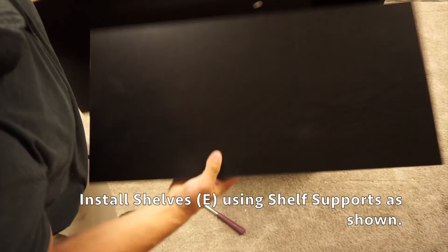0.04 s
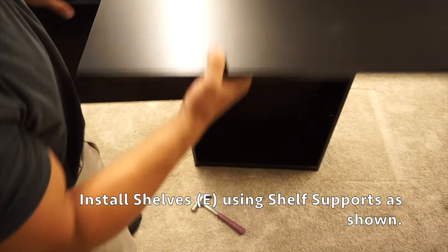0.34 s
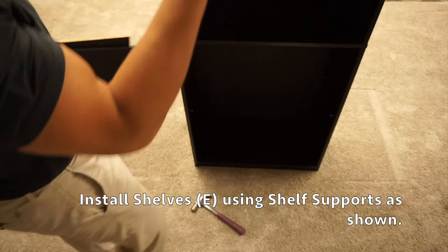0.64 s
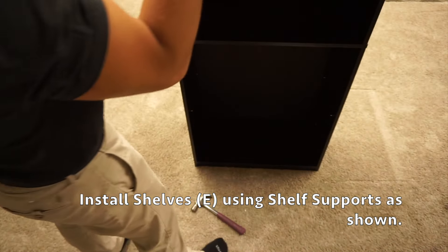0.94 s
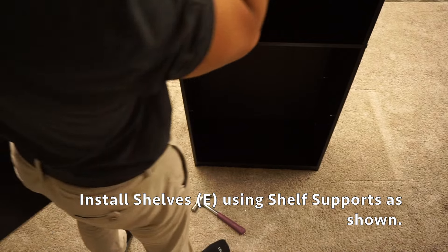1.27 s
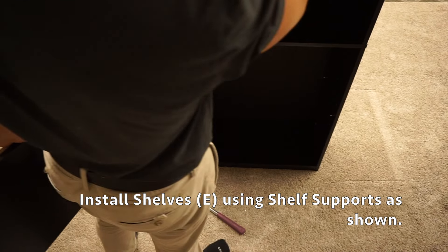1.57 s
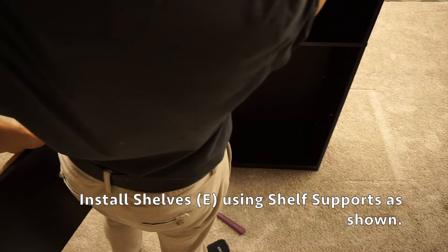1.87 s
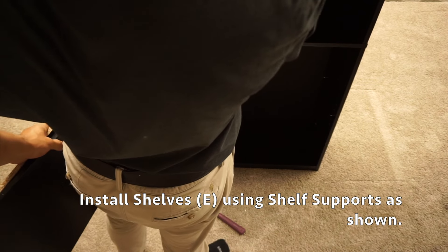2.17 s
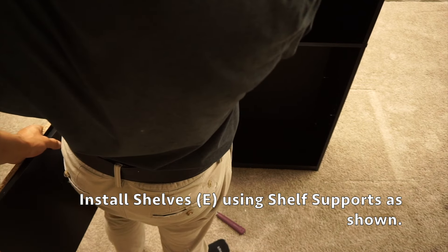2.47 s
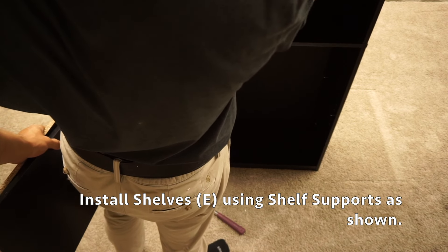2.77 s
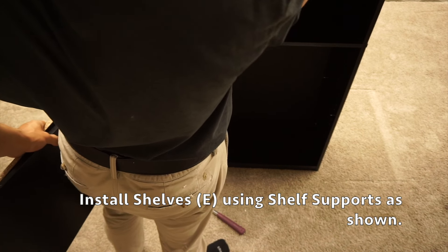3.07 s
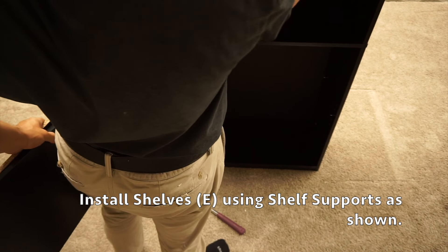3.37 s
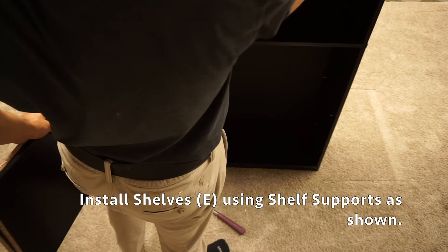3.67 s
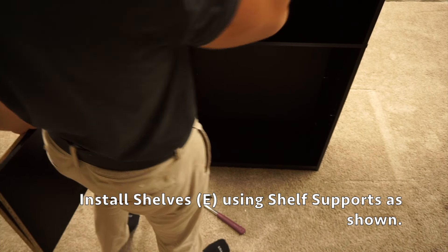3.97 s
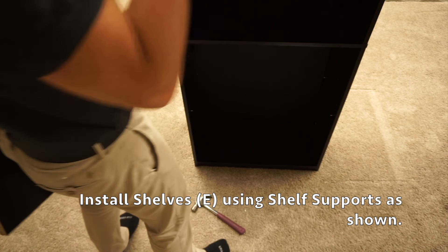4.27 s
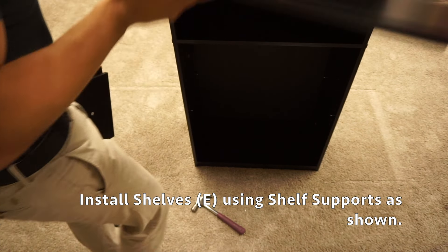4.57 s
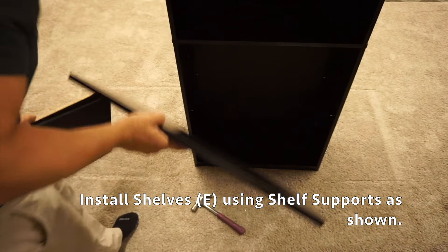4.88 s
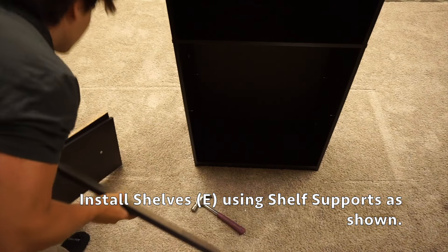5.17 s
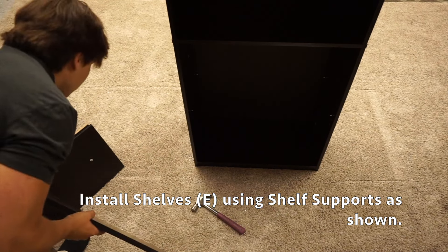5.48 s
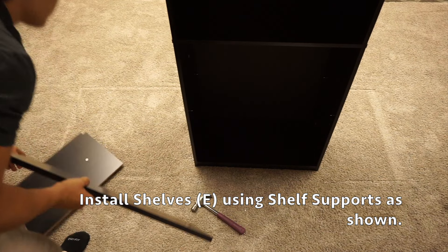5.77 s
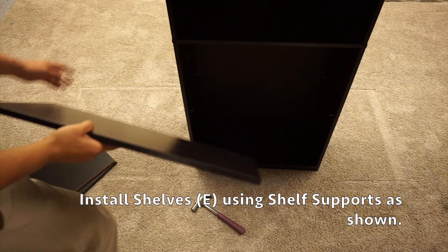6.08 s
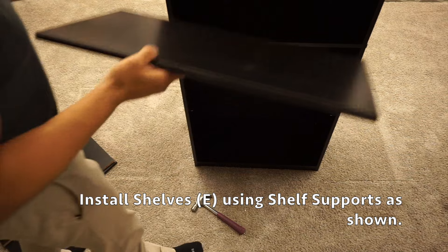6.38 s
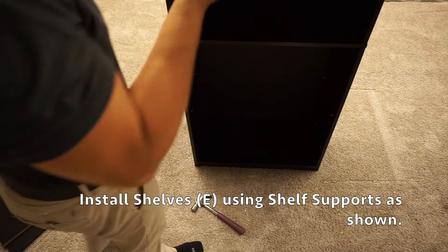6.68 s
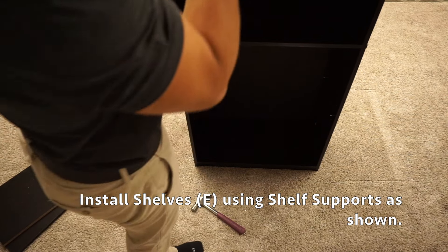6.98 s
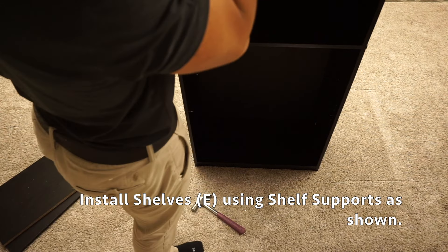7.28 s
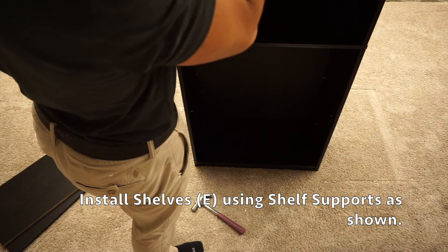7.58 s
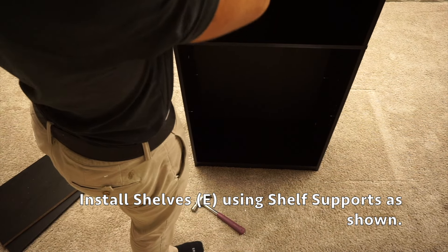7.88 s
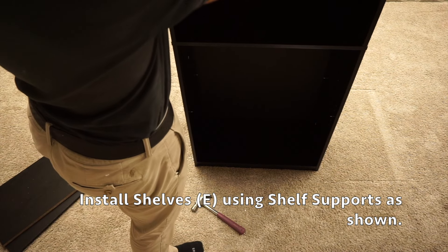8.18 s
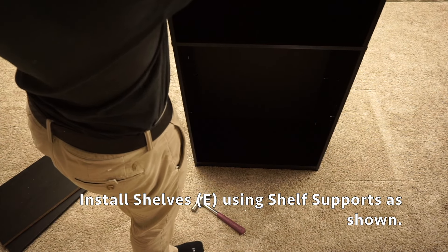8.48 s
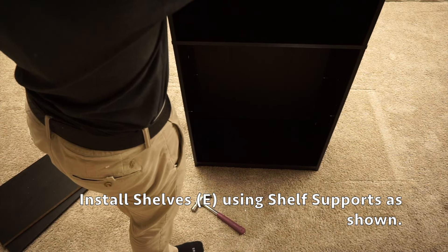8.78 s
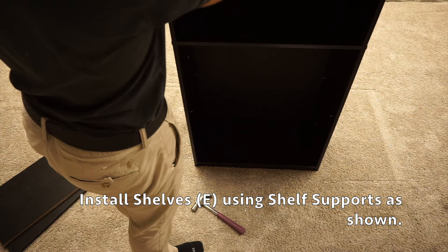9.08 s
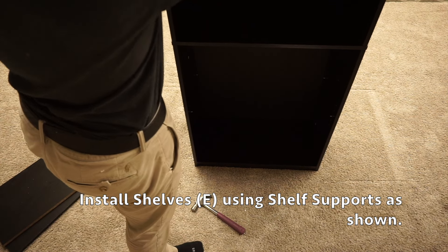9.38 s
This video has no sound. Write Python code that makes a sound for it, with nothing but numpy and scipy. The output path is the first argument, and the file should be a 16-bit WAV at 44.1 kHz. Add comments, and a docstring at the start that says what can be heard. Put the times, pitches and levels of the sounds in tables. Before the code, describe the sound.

Two wooden shelves bump, rasp and settle inside a hollow cabinet, one after the other, over a low room hum.

```python
"""Wooden shelf boards knock and scrape into a hollow bookcase, which rings with every contact.
Each of the two boards bumps the side panels, rasps inward in short pushes with the odd stick-slip
squeak, drops onto its pegs and rocks to rest. Between the two, a board is picked up and thumps the
carpet, and clothes rustle. Under it all lie a low ventilation rumble, mains hum and a faint hiss."""
import sys
import numpy as np
from scipy import signal
from scipy.fft import rfft, irfft, next_fast_len
from scipy.io import wavfile
from scipy.ndimage import uniform_filter1d

SR = 44100
rng = np.random.default_rng(int(sys.argv[2]) if len(sys.argv) > 2 else 0)


def generate_wav(signal):
    """Clip the signal to [-1, 1] and save it as 16-bit WAV at the path in sys.argv[1]."""
    frames = np.transpose(np.atleast_2d(signal))
    scaled = np.clip(frames, -1, 1) * 32767
    pcm = np.round(scaled).astype(np.int16)
    wavfile.write(sys.argv[1], SR, pcm)


N = 420846


def amp(db):
    return 10 ** (np.asarray(db) / 20)


def unit_rms(x):
    return x / np.sqrt(np.mean(x ** 2) + 1e-20)


def bins(size):
    return np.fft.rfftfreq(size, 1 / SR)


def add(mix, start_s, sound):
    part = mix[:, max(round(start_s * SR), 0):][:, :sound.shape[1]]
    part += sound[:, :part.shape[1]]


def curve_at(points, hz):
    """A curve of straight lines on a log-frequency axis."""
    point_hz, value = np.transpose(points)
    return np.interp(np.log(hz + 1), np.log(point_hz + 1), value)


def eq(x, points):
    """Shapes x with an EQ curve of (Hz, dB) points."""
    size = next_fast_len(x.shape[-1])
    return irfft(rfft(x, size) * amp(curve_at(points, bins(size))), size)[..., :x.shape[-1]]


def causal(db):
    """Minimum-phase response with the given gain: nothing sounds before the blow."""
    log_gain = np.log(amp(np.r_[db, db[-2:0:-1]]))
    return np.exp(np.conj(signal.hilbert(log_gain)))[:len(db)]


def wander(hz):
    """Random unevenness up to the given rate."""
    return unit_rms(signal.sosfilt(signal.butter(2, hz, fs=SR, output="sos"), rng.standard_normal(N)))


# Tone of the background air. Each row: frequency in Hz, relative level in dB.
AIR_EQ = [(12, -16), (20, -2.5), (64, 3), (92, -4), (124, -4.5), (157, -12), (204, -18), (288, -17.5),
          (328, -23.5), (355, -19), (475, -22.5), (528, -20.5), (1300, -27.5), (3020, -34.5), (11000, -39),
          (14300, -93), (22000, -120)]
# Its stereo spread. Each row: frequency in Hz, side against mid in dB.
AIR_WIDTH = [(20, -44), (60, -34), (110, -20), (190, -4.5), (350, -2), (1100, 1.5), (3600, 2), (11000, 0.5)]

def room_tone(air_db=-48.5, hum_hz=121.3, hum_db=-57.5):
    """A steady bed of ventilation rumble, mains hum and microphone hiss, as left and right."""
    mid, side = amp(air_db) * unit_rms(eq(rng.standard_normal((2, N)), AIR_EQ))
    mid = mid + amp(hum_db) * np.sqrt(2) * np.sin(2 * np.pi * hum_hz * np.arange(N) / SR)
    side = eq(side, AIR_WIDTH)
    return np.array([mid + side, mid - side])


# Decay of the carpeted room. Each row: frequency in Hz, seconds to fall by 60 dB.
ROOM_DECAY = [(60, 0.55), (150, 0.24), (350, 0.34), (1000, 0.37), (3000, 0.58), (9000, 0.42)]
# Tone of the reverb as it begins. Each row: frequency in Hz, relative level in dB.
ROOM_EQ = [(60, 2), (150, -7), (350, -7), (1000, -10.5), (3000, -19), (9000, -16)]

def room_tail(size):
    """Mid and side of the room's echoes; each frequency dies at its own speed."""
    hz, t, noise = signal.stft(rng.standard_normal((2, size)), SR, nperseg=256)
    fade_db = curve_at(ROOM_EQ, hz)[:, None] - 60 * t / curve_at(ROOM_DECAY, hz)[:, None]
    return signal.istft(noise * amp(fade_db), SR, nperseg=256)[1][:, :size]


def in_room(x, wet_db):
    """Adds the room's echoes to a mid and side pair."""
    tail = room_tail(size=32768)
    return x + amp(wet_db) * signal.oaconvolve(x[:1], tail / np.linalg.norm(tail[0]), axes=1)[:, :N]


def stroke(start_s, rise_s, length_s, db, swell_db=17, release_db_per_s=286):
    """Envelope of one rubbing movement: it swells, holds, and dies away once the hand stops."""
    t = np.arange(N) / SR - start_s
    attack_db = -swell_db * np.clip(1 - t / max(rise_s, .001), 0, 1)
    release_db = -release_db_per_s * np.clip(t - length_s, 0, 1)
    return (t >= 0) * amp(db + attack_db + release_db)


def friction(eq_points, uneven_db, catch_hz, panels=()):
    """Countless tiny slips merge into a rasp that swells as surfaces catch, ringing any panels given."""
    slips = amp(uneven_db * wander(catch_hz)) * rng.standard_normal((2, N))
    size = 2 * next_fast_len(N // 2 + 1)
    for panel in panels:
        slips = irfft(rfft(slips, size) * panel(bins(size)), size)[:, :N]
    return unit_rms(eq(slips, eq_points))


# Cloth's midrange rub and its airy hiss. Each row: frequency in Hz, relative level in dB.
RUB_EQ = [(200, -3), (600, 0), (1100, 6.5), (2500, 1), (5000, -15)]
HISS_EQ = [(1000, -25), (2500, 0.5), (4300, 2.5), (7000, -4.5), (11000, -7)]
# Clothes and board brushing the carpet. Each row: start, attack and length in seconds,
# relative levels of rub and hiss in dB.
BRUSHES = [(0.923, 0.063, 0.21, -60.5, -69), (4.7, 0.077, .54, -61.5, -70.5),
           (5.261, .018, 0.076, -76, -53.5), (5.398, 0.011, 0.14, -58.5, -55.5),
           (5.579, 0.04, 0.086, -49.5, -61), (5.745, 0.18, 0.067, -51, -46.5),
           (5.844, .002, .005, -46.5, -55), (5.872, 0.092, 0.25, -60.5, -54.5),
           (6.138, 0.07, 0.22, -60, -64)]

def rustle():
    """Cloth and carpet fibres brush in a fine, soft grain."""
    rub = amp(-3) * friction(RUB_EQ, uneven_db=0.5, catch_hz=60)
    hiss = amp(-1) * friction(HISS_EQ, uneven_db=1.9, catch_hz=150)
    out = np.zeros((2, N))
    for *timing, rub_db, hiss_db in BRUSHES:
        out += stroke(*timing, rub_db) * rub + stroke(*timing, hiss_db) * hiss
    return in_room(out, wet_db=-4.5)


# Board on the floor. Each row: mode frequency in Hz, relative level in dB, seconds to fall by 60 dB.
FLOOR_MODES = [(73, -16, 0.18), (120, -5, 0.046), (127, -5.5, 0.086), (149, -8.5, 0.068),
               (295.6, -13.5, 0.13), (354, -26, 0.099), (425, -33, 0.17)]
# Fibres crushed under the board's corner. Each row: frequency in Hz, relative level in dB.
PUFF_EQ = [(80, -18), (200, 6.5), (380, 5), (550, -14.5), (1000, -23), (2500, -51), (6000, -42)]

def carpet_thump(start_s=5.8435, rise_s=0.004, ring_db=-5.5, puff_db=-31, puff_s=0.073):
    """A board's corner lands on carpet, which softens the blow to the lowest modes and a dull puff."""
    out, t = np.zeros((2, N)), np.arange(SR) / SR
    ring = sum(amp(db - 60 * t / t60) * np.sin(2 * np.pi * hz * t) for hz, db, t60 in FLOOR_MODES)
    puff = amp(puff_db) * unit_rms(eq(rng.standard_normal((2, SR)), PUFF_EQ)) * np.exp(-t / puff_s)
    attack = 1 - np.exp(-t / rise_s)
    add(out, start_s, (amp(ring_db) * np.array([ring, 0 * ring]) + puff) * attack)
    return in_room(out, wet_db=-9.5)


# Squeaking edges. Each row: midpoint in seconds, length in seconds, pitch in Hz, level in dB.
SQUEAKS = [(.02, 0.058, 404, -51), (0.163, 0.1, 398, -47), (0.181, 0.08, 1024, -44),
           (0.208, 0.045, 511, -39), (.19, 0.059, 1808, -53.5), (2.576, 0.038, 296.4, -28),
           (4.002, 0.0388, 296, -25.5), (5.615, 0.058, 694, -51.5), (5.643, 0.097, 990, -51.5),
           (9.033, 0.015, 2790, -49.5), (9.377, .045, 648, -31.5)]

def squeaks(waver=0.021, overtone_db=-22):
    """An edge sticks and slips at a nearly steady rate, giving a short, wavering tone."""
    out = np.zeros((2, N))
    for middle_s, length_s, hz, db in SQUEAKS:
        wobble = unit_rms(uniform_filter1d(rng.standard_normal(SR), size=200))[:int(length_s * SR)]
        phase = 2 * np.pi * np.cumsum(hz * (1 + waver * wobble)) / SR
        envelope = amp(db) * np.sqrt(2) * np.hanning(len(phase))
        tone = envelope * (np.sin(phase) + amp(overtone_db) * np.sin(2 * phase))
        add(out, middle_s - length_s / 2, np.array([tone, 0 * tone]))
    return in_room(out, wet_db=-9.0)


def resonances(modes, hz):
    """Response of a panel: ringing peaks on a flat floor of dense modes."""
    peaks = sum(amp(db) ** 2 / (1 + (2 * (hz - centre) / width) ** 2) for centre, width, db in modes)
    return causal(10 * np.log10(1 + peaks))


# Modes of a shelf board. Each row: frequency in Hz, width in Hz, dB against the floor of dense modes.
BOARD_MODES = [(624, 22, 2), (798, 23, 2.5), (1634, 18, 8), (1910, 57, 6), (2260, 50, 10), (2780, 63, 5),
               (2920, 84, 9.5), (3870, 76, 8), (4460, 67, 0.5), (5900, 90, 1.5)]

def board(hz):
    """The bright ring of a board while its edge rasps."""
    return resonances(BOARD_MODES, hz)


# Modes of the bookcase. Each row: frequency in Hz, width in Hz, dB against the floor of dense modes.
CABINET_MODES = [(39.5, 2.7, 21), (59.2, 1.6, 23), (88, 3.2, 15.5), (127, 10, -3), (149.5, 8, 8),
                 (204.4, 3.5, 10.5), (237.6, 8.8, 10), (274, 26, 1.5), (273.7, 29, 7), (303, 28, 7.5),
                 (388, 6.2, -11), (424.2, 6.8, 10.5), (633, 18, 9), (778, 37, 0.5), (837, 9.2, 8.5),
                 (926, 15, 12.5), (1038, 44, 14), (1083, 34, 9.5), (1210, 23, 10), (1366, 40, 10),
                 (1878, 58, 3), (2150, 140, -3), (2130, 9.1, 8), (2450, 25, 6.5), (2708, 59, 10),
                 (3610, 20, 9), (3690, 78, 2.5), (4560, 24, -24), (4764, 27, 7), (4570, 38, 3.5),
                 (5680, 51, 6), (6890, 56, 8.5)]

def cabinet(hz):
    """The hollow ring of the bookcase's panels."""
    return resonances(CABINET_MODES, hz)


# The board's low drag and its edge's bright grit. Each row: frequency in Hz, relative level in dB.
DRAG_EQ = [(60, -26.5), (140, -7), (290, 6.5), (450, -2.5), (680, -2.5), (1000, -15.5), (1800, -14),
           (2900, -21), (4500, -60)]
GRIT_EQ = [(300, -34), (800, -14.5), (1900, 3.5), (2800, -3), (3300, 3), (4200, -1), (6000, -9),
           (11000, -10.5)]
# Pushes along the side panels. Each row: start, attack and length in seconds, relative levels of drag
# and grit in dB, the board mode that the grip leaves free in Hz.
PUSHES = [(0.0, 0.0013, 0.0084, -46, -57, 1270), (0.091, 0.047, 0.12, -56, -53, 1340),
          (2.112, 0.084, 0.18, -32, -52.5, 1980), (2.5, 0.058, 0.08, -30.5, -40.5, 4230),
          (2.737, 0.066, 0.08, -35.5, -46.5, 4060), (3.107, 0.029, 0.22, -55, -60.5, 1820),
          (3.737, 0.085, .16, -49, -52.5, 1740), (7.627, 0.048, 0.087, -56.5, -47.5, 4700),
          (7.986, .02, 0.093, -41.5, -48, 1920), (8.137, 0.01, 0.044, -30.5, -41, 2220),
          (8.205, 0.017, 0.083, -27, -42.5, 1620), (8.305, 0.04, 0.096, -26.5, -38.5, 2280),
          (8.438, 0.0078, 0.037, -44, -47, 6740)]

def scrapes(ring_db=-2, ring_q=13, judder_db=1.2, judder_hz=50):
    """The board's weight shakes the panels while its raw edge rasps along them and sets it ringing."""
    drag = amp(-3) * friction(DRAG_EQ, uneven_db=-2.5, catch_hz=120, panels=(cabinet, board))
    grit = amp(-2) * friction(GRIT_EQ, uneven_db=2.0, catch_hz=214, panels=(cabinet, board))
    out = np.zeros((2, N))
    for *timing, drag_db, grit_db, ring_hz in PUSHES:
        rasp = grit + amp(ring_db) * signal.lfilter(*signal.iirpeak(ring_hz, ring_q, fs=SR), grit)
        out += stroke(*timing, drag_db) * drag + stroke(*timing, grit_db) * rasp
    return in_room(out * amp(judder_db * wander(judder_hz)), wet_db=-10.0)


# Edges in Hz of a knock's five registers: boom, body, clack, crack and tick.
REGISTER_EDGES_HZ = [60, 180, 500, 1500, 4500, 11000]
# Offsets in dB that all knocks share, for body, clack, crack and tick.
REGISTER_DB = [0.12, 2.35, 0.52, 0.28]

def knock_colour(spectrum, hz, strength_db, tilt_db, boom_db, window_s=0.028):
    """EQ that balances a knock's registers: the softer the contact, the faster the treble falls off."""
    edges = np.array(REGISTER_EDGES_HZ)
    centres = np.sqrt(edges[1:] * edges[:-1])
    octaves_above_body = np.log2(centres[1:] / centres[1])
    target_db = strength_db + np.r_[boom_db, np.array(REGISTER_DB) + tilt_db * octaves_above_body]
    energy = np.histogram(hz, edges, weights=abs(spectrum) ** 2)[0] / (len(hz) - 1)
    gain_db = target_db - 10 * np.log10(energy / (window_s * SR))
    return causal(curve_at(np.c_[centres, gain_db], hz))


# Broad tone of the struck wood. Each row: frequency in Hz, relative level in dB.
WOOD_EQ = [(30, -13.5), (70, -10), (100, -1.5), (135, 10), (300, 1.5), (480, -4), (1000, -25.5),
           (2000, -13.5), (3200, -15.5), (4200, -22), (5300, -35), (7000, -40.5), (11000, -45.5)]
# Board against cabinet. Each row: start in seconds, the low and the high mode this spot favours in Hz,
# strength in dB, hardness as treble tilt in dB per octave, carcass boom in dB, chatter decay in seconds.
KNOCKS = [(0.712, 133, 820, -60.5, -2.5, -3, 0.0062), (1.127, 372, 1820, -53.5, -3.5, -9, 0.0039),
          (1.279, 310, 2100, -31.5, -4, -7, 0.013), (1.282, 294, 965, -20.5, -7, -30.5, 0.0096),
          (1.296, 292, 930, -20, -13, -18, 0.0055), (1.5535, 273, 1060, -32.5, -0.42, 3, .007),
          (1.559, 289, 1860, -17.5, -6.5, -20, .0043), (1.6, 292, 1370, -18, -17, -12, 0.0054),
          (1.645, 261, 1090, -29.5, -6.5, -10, 0.0014), (1.803, 325, 1050, -23, -6, 3.5, 0.018),
          (1.826, 148, 412, -22, -7.5, -5.5, 0.012), (1.872, 291, 3460, -40, -3.5, 12.5, 0.027),
          (1.929, 136, 1810, -33.5, -9, 3.5, 0.028), (2.26, 316, 6600, -17, -7.5, -9.5, 0.014),
          (2.322, 285, 435, -26, -12, -10, 0.01), (2.36, 330, 1130, -23.5, -10.5, -31, 0.0058),
          (2.374, 321, 970, -20.5, -19.5, -3, 0.008), (2.513, 303, 3750, -48, -8, -10, 0.0048),
          (2.812, 292, 3820, -33, -5.5, -2.5, 0.0053), (2.829, 280, 430, -30.5, -13, -5.5, 0.014),
          (3.958, 315, 4700, -57, 1, 2, 0.016), (3.975, 304, 2290, -27, -5.5, -30, 0.016),
          (3.993, 305, 700, -27, -6.5, -9.5, 0.008), (4.051, 268, 1071, -37.5, -2.5, -9, 0.022),
          (4.061, 303, 1050, -28, -5, -14, 0.014), (7.431, 269, 770, -16, -13, -15, 0.012),
          (7.448, 207, 861, -17.5, -20, -9, 0.014), (7.479, 208, 730, -25.5, -8.5, -0.5, 0.011),
          (7.509, 287, 800, -20.5, -13, -3, 0.012), (7.793, 306, 1090, -33.5, -4, -15, 0.018),
          (7.809, 161, 1060, -29, -5, -4, 0.01), (7.895, 323, 3900, -26, -5, -14, 0.011),
          (7.913, 310, 710, -26, -4.5, -7.5, 0.015), (7.956, 185, 5300, -47, -1, 0, 0.015),
          (8.218, 282, 800, -27.5, -5.5, -13, 0.034), (8.5178, 145, 1560, -17, -5, -9.5, 0.013),
          (8.535, 264, 3600, -26, -4.5, 5, 0.0052), (8.546, 153, 2720, -21, -3.5, -6, 0.0038),
          (8.595, 137, 1220, -24.5, -10, -2, 0.0027), (8.6657, 302, 5600, -23.5, -1, 3, 0.017),
          (8.771, 160, 590, -19.5, -9, -4.5, 0.014), (8.855, 153, 600, -31, -12.5, -17.5, 0.011),
          (8.941, 163, 847, -33, -15.5, 4.5, 0.023), (9.033, 171, 2780, -42.5, -9, -33, 0.036),
          (9.135, 156, 527, -44.5, -25, 12, 0.01), (9.355, 150, 3850, -42.5, -3, -11, 0.015),
          (9.369, 171, 740, -29, -5, 8.5, 0.015), (9.383, 159, 620, -29, -13, -8.5, 0.014)]

def knocks(push=3.7, heave=10.5, heave_hz=600, glancing_s=0.038, echo_build_s=0.0065,
           low_db=7, low_width_hz=34, high_db=3, high_q=10):
    """Each contact is a thrust and a short chatter; its hardness and place colour the cabinet's ring."""
    size = 32768
    out, t, hz = np.zeros((2, N)), np.arange(size) / SR, bins(size)
    body = cabinet(hz) * causal(curve_at(WOOD_EQ, hz))
    # a hard edge gives an instant push; the board's mass follows with a slower heave
    thrust = np.array([push + heave / (1 + 1j * hz / heave_hz) ** 3, np.zeros(len(hz))])
    for start_s, low_hz, high_hz, strength_db, tilt_db, boom_db, chatter_s in KNOCKS:
        # a glancing contact starts softly and chatters longer; a square one has more thrust
        squareness = 1 / (1 + (chatter_s / glancing_s) ** 2)
        age = t / chatter_s
        chatter = rng.standard_normal((2, size)) * np.exp(-age) * (1 - np.exp(-age / 0.06))
        echoes = room_tail(size) * (1 - np.exp(-t / echo_build_s))
        low_mode = 1 + amp(low_db) / (1 + 2j * (hz - low_hz) / low_width_hz)
        high_mode = 1 + amp(high_db) / (1 + 2j * high_q * (hz / high_hz - 1))
        spectrum = (squareness * thrust + rfft(chatter + echoes)) * body * low_mode
        colour = knock_colour(spectrum[0], hz, strength_db, tilt_db, boom_db)
        add(out, start_s, irfft(spectrum * colour * high_mode))
    return out


# Stereo spread of the action. Each row: frequency in Hz, side gain in dB.
STEREO_WIDTH = [(60, -33), (125, -28), (250, -22.5), (500, -13.5), (1000, -8.5), (2000, -7.2), (4000, -5.2),
                (9000, -4.5)]
# Its pan. Each row: frequency in Hz, left against right in dB.
STEREO_PAN = [(60, -.1), (125, -.3), (250, -.6), (500, -1.5), (1000, -3.2), (2000, -3.1), (4000, -2.2),
              (9000, -2.3)]

def scene():
    """The shelf work over the room tone: the bass sits centred, the treble is wide and leans right."""
    mid, side = knocks() + scrapes() + squeaks() + carpet_thump() + rustle()
    side = eq(side, STEREO_WIDTH)
    left = eq(mid + side, [(hz, db / 2) for hz, db in STEREO_PAN])
    right = eq(mid - side, [(hz, -db / 2) for hz, db in STEREO_PAN])
    return np.array([left, right]) + room_tone()


def record(dry):
    """A steep high cut takes off the top octave."""
    low_pass = signal.firwin(401, cutoff=11250, window=("kaiser", 8), fs=SR)
    return signal.oaconvolve(dry, low_pass[None], "same", axes=1)


dry = scene()
out = record(dry)
generate_wav(out)
```